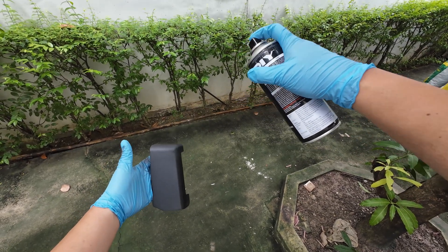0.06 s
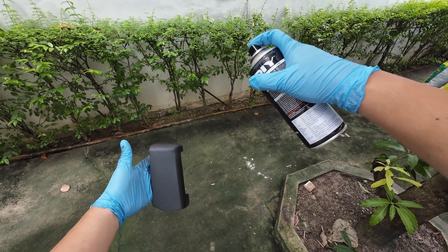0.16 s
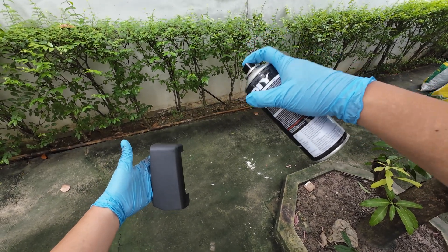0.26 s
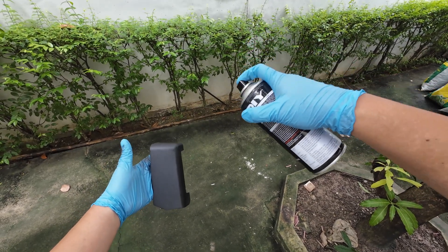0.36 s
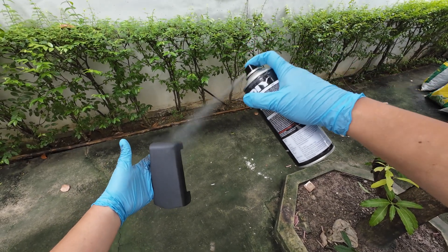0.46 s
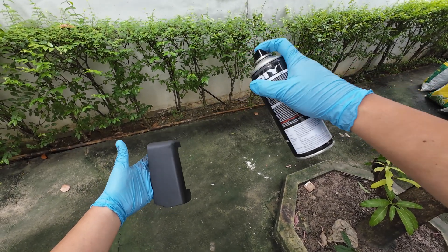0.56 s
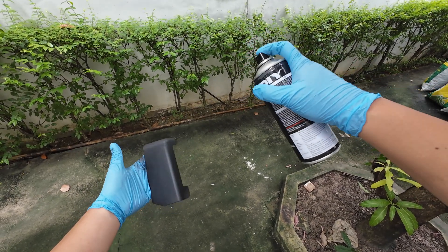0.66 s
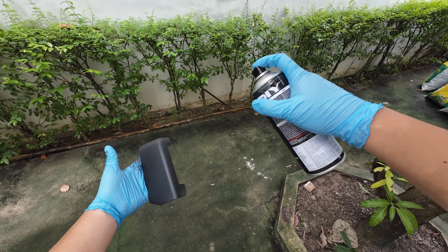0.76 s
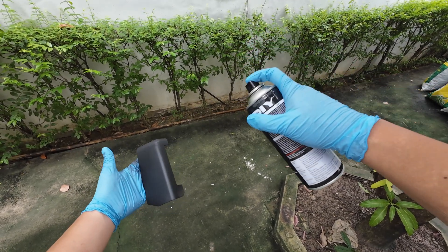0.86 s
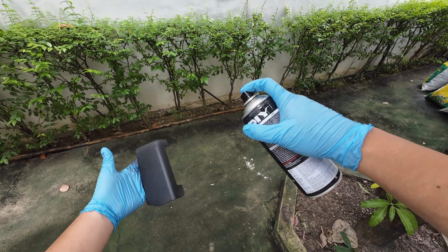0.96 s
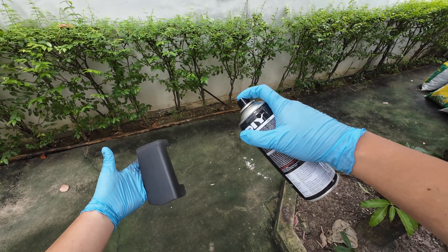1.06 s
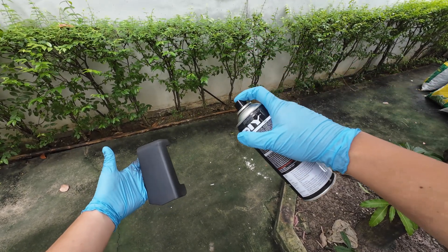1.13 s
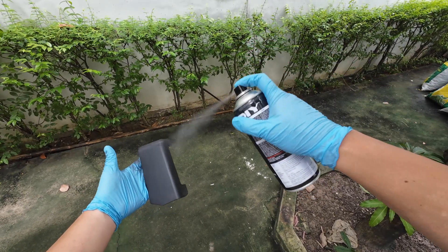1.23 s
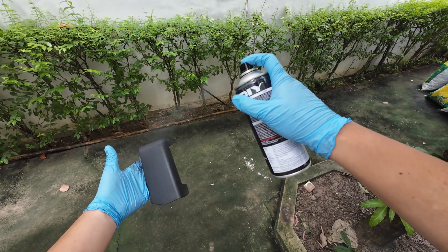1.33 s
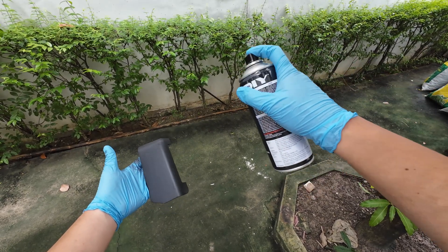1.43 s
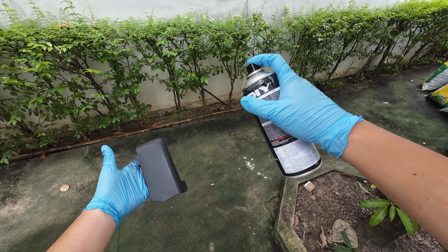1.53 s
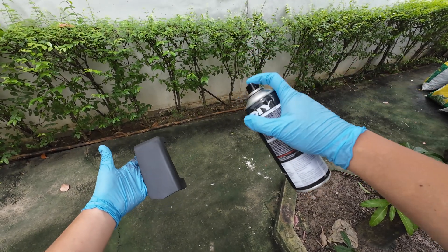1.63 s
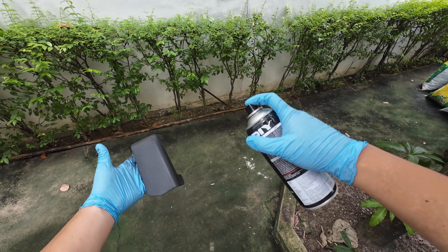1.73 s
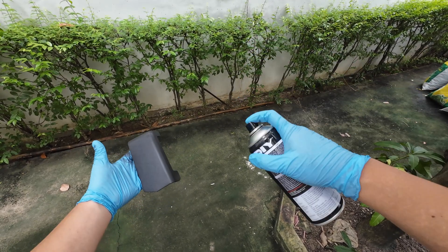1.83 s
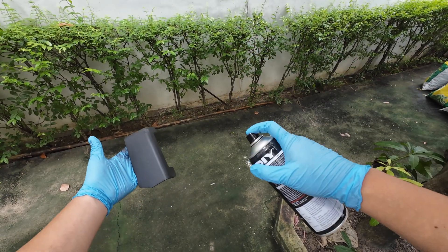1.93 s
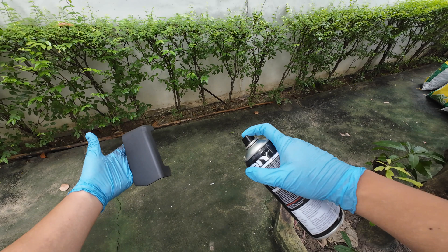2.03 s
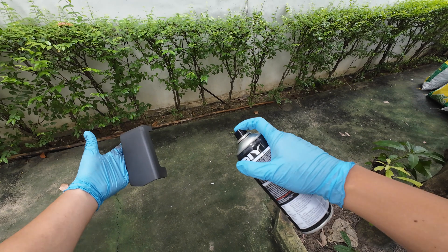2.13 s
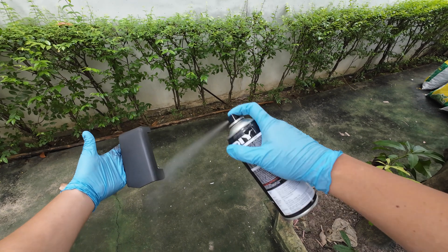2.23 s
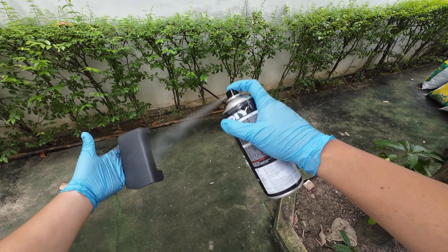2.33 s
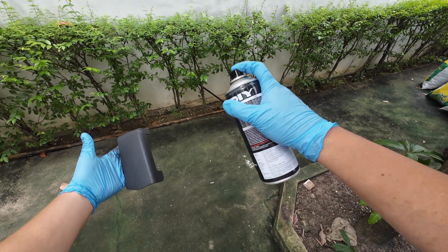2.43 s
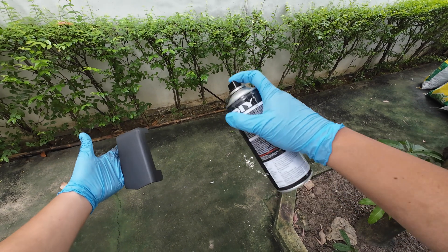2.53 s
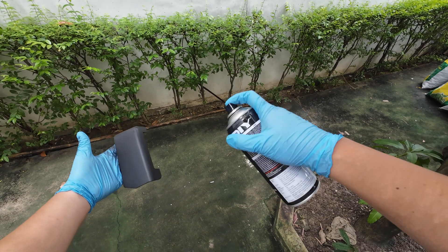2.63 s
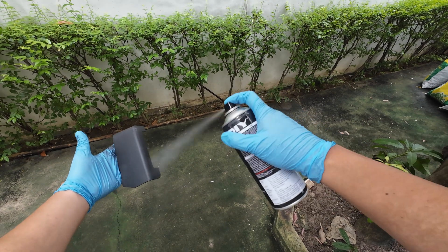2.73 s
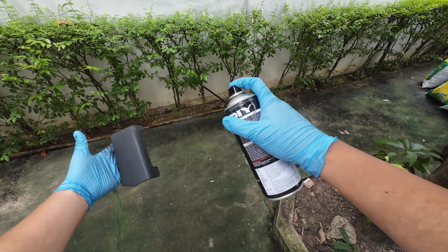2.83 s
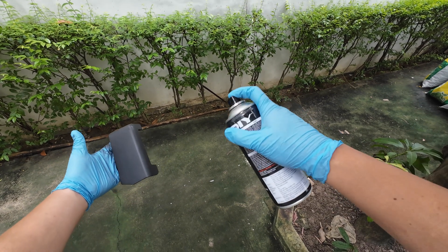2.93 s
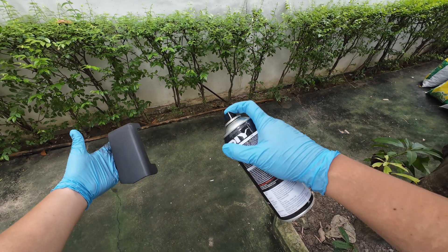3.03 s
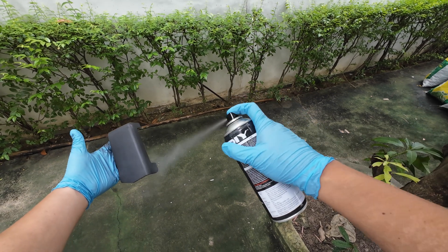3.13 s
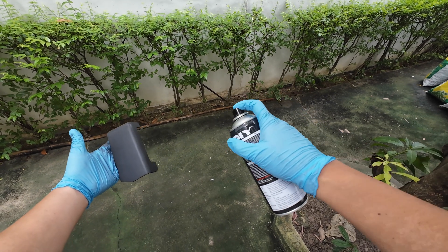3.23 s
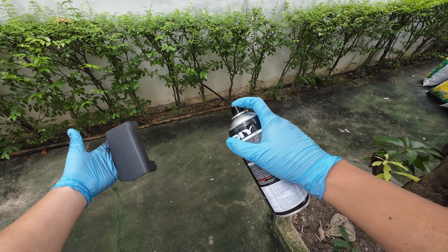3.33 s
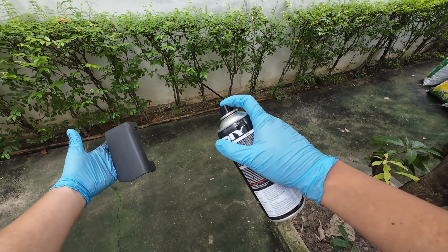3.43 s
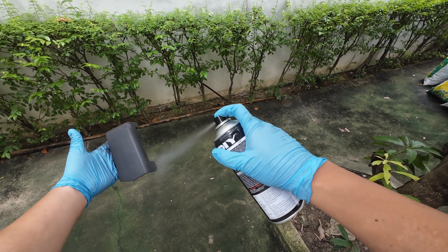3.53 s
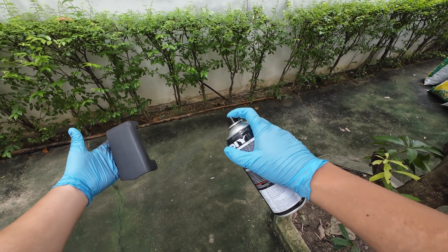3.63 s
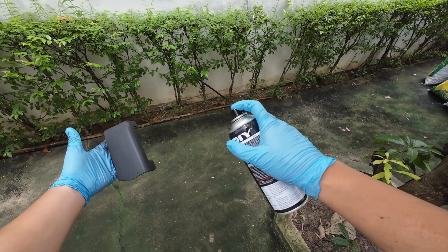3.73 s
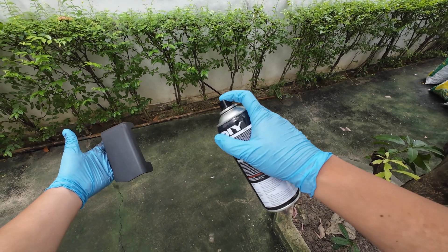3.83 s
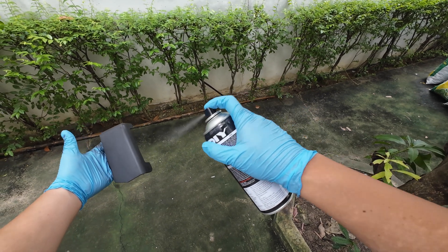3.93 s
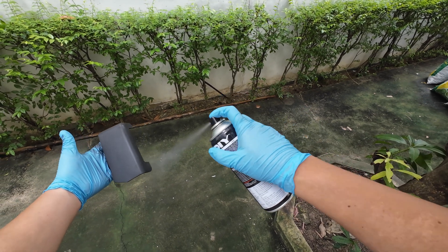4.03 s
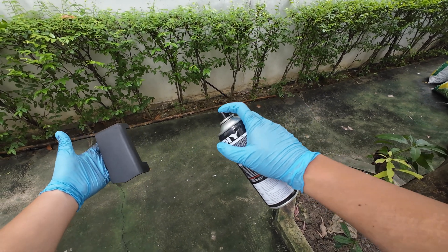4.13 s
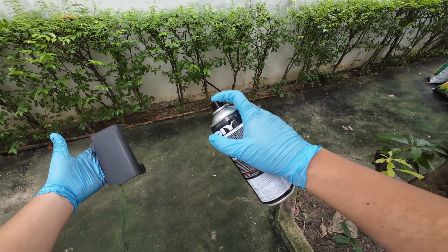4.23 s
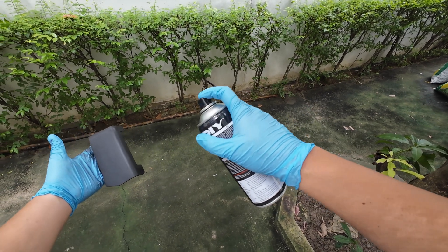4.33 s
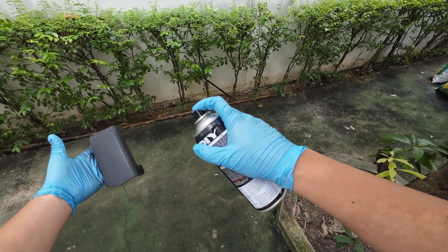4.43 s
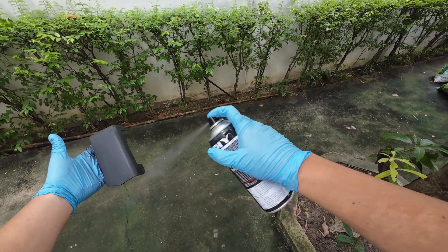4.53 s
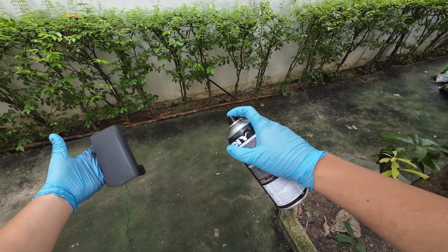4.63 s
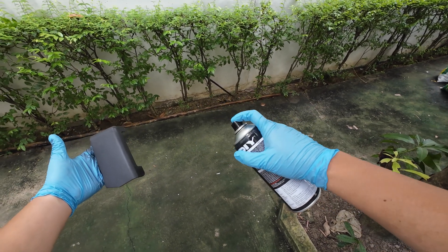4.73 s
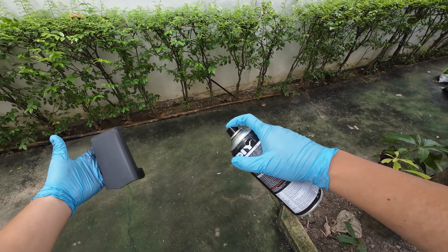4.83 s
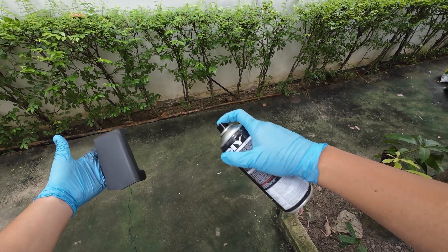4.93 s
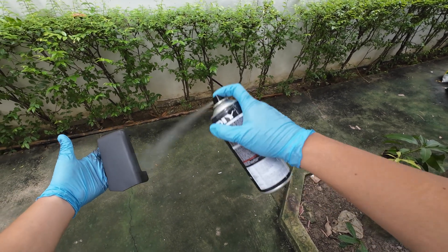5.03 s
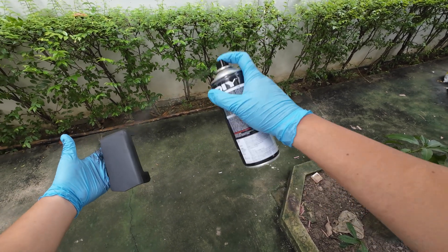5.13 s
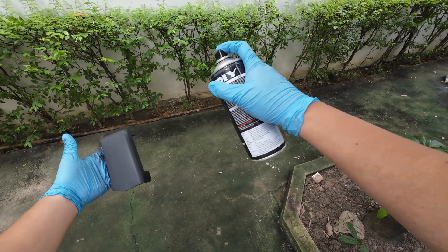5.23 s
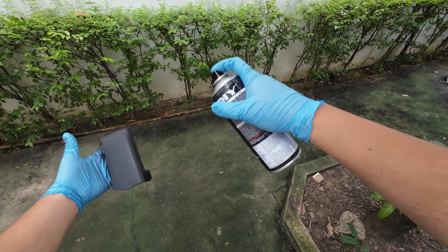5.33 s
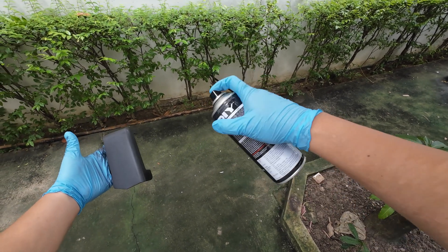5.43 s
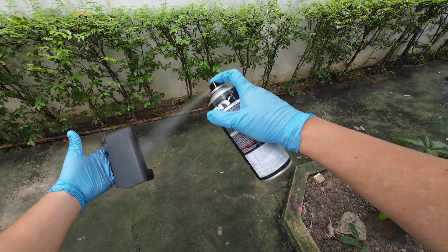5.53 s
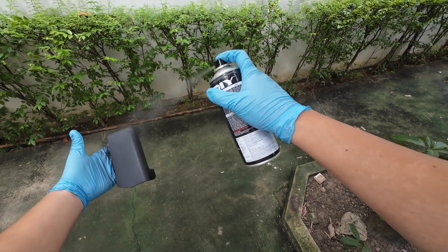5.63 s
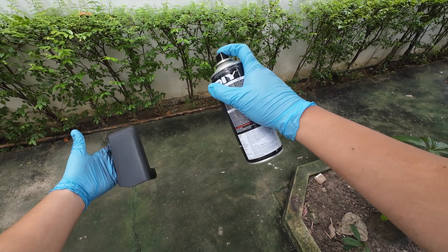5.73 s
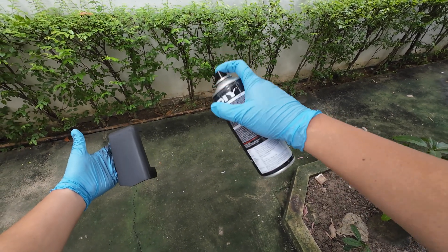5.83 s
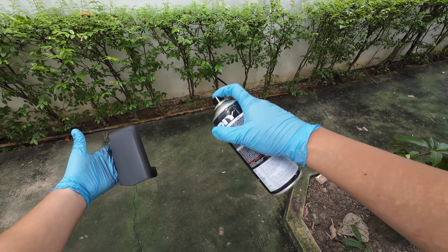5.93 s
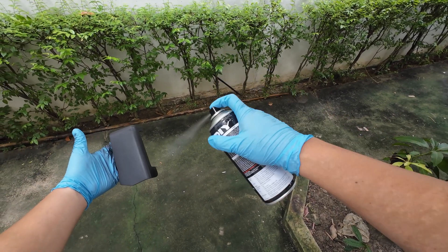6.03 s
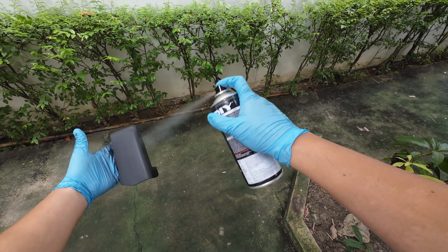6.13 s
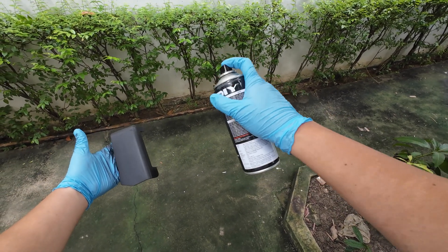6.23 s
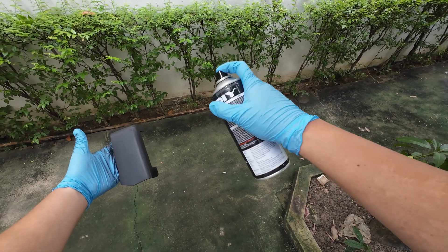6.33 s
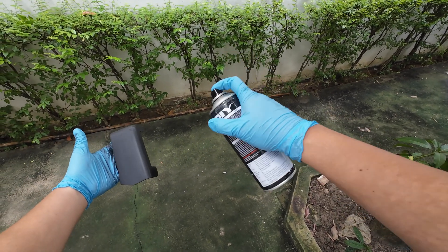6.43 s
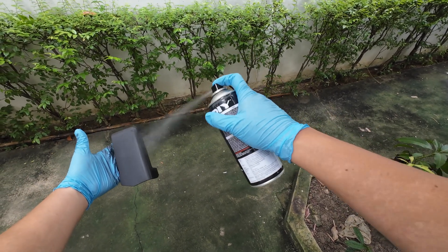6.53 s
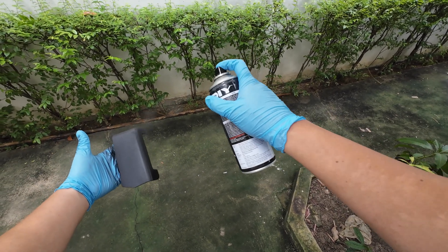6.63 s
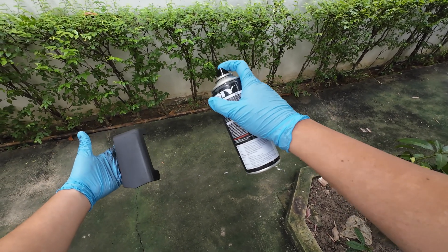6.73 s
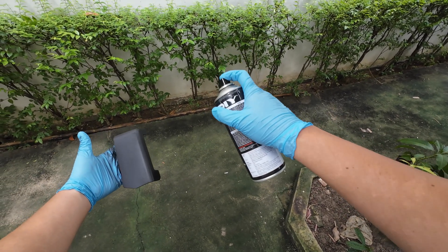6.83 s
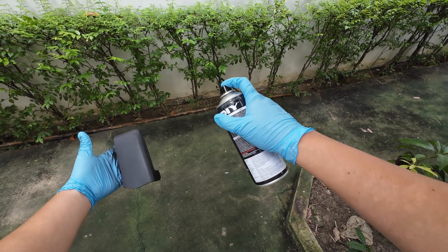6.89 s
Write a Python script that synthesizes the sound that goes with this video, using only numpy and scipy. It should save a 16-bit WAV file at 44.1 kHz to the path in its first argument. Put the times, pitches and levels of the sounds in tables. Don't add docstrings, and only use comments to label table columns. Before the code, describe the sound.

An aerosol paint can sprays thirteen short hissing bursts, about two a second, over a quiet garden bed of rumble and rustling leaves.

```python
import sys
import numpy as np
from scipy import signal
from scipy.fft import rfft, irfft, next_fast_len
from scipy.io import wavfile
from scipy.ndimage import uniform_filter1d, map_coordinates

SR = 44100
rng = np.random.default_rng(int(sys.argv[2]) if len(sys.argv) > 2 else 0)


def linear_from_db(decibels):
    return 10 ** (np.asarray(decibels, float) / 20)


def pcm_store(signal):
    levels = np.round(np.clip(np.atleast_2d(signal), -1, 1) * 32767)
    wavfile.write(sys.argv[1], SR, levels.astype(np.int16).T)


N = 306936

# pitch_hz, level_db (per Hz)
TOWN_COLOUR = [(12, -29), (20, -0.5), (42, 1), (70, -8), (103, -2.5), (173, -10.5), (230, -3.5), (262, -12),
               (298, -3.5), (329, -9.5), (493, -10.5), (529, -10.5), (620, -15.5), (810, -44.5),
               (1360, -120)]
TRAFFIC_COLOUR = [(340, -33), (580, -5), (729, -3.5), (920, -10), (1000, -12.5), (1400, -30.5),
                  (1820, -58.5), (3080, -120)]
LEAVES_COLOUR = [(650, -29.5), (1100, -6.5), (1440, -7), (2270, -7.5), (2560, -9.5), (2890, -7.5),
                 (4500, -17), (5850, -45.5), (9900, -120)]
RUSTLE_COLOUR = [(2350, -30), (4000, -4), (5310, -5), (7180, -13.5), (7820, -11), (11600, -14.5),
                 (13300, -14), (15600, -25)]
# time_s, level_db
TOWN_LEVEL = [(0, -49.5), (1.2, -49.5), (1.7, -50.5), (2.6, -49.7), (4.9, -51.3), (5.9, -51), (6.6, -49),
              (6.96, -49.5)]
# time_s, level_db
TRAFFIC_LEVEL = [(0, -61), (.55, -65), (1.1, -60), (1.65, -65.5), (2.15, -60.5), (3.4, -62.5), (3.75, -67),
                 (4.65, -61), (5.1, -62), (5.75, -68), (6.96, -65)]
# pitch_hz, width_hz, level_db
MACHINERY = [(97, 11, -64.5), (239, 8, -66.5), (305, 8, -68.5), (381.5, 6, -64.5), (521.5, 8, -68),
             (713.6, 8, -74)]
# time_s, strength_db
BREEZE_STRENGTH = [(0, -1), (1.55, -2), (1.85, 2), (2.1, -1.5), (2.65, 1.5), (3.05, 0), (3.45, 2),
                   (3.85, -1), (4.4, 1), (4.85, -1.5), (5.8, -1.5), (5.95, .5), (6.42, -.5), (6.96, 1.5)]
# loudest_s, level_db, pitch_hz, rise_db_per_s, fall_db_per_s
WHINE_PASSES = [
    (.28, -76, 2905, 35, 25),
    (2.05, -81, 2890, 30, 30),
    (2.54, -73, 2895, 120, 25),
    (6.85, -74, 2890, 120, 200),
    (6.87, -75, 2620, 200, 60),
]
# pitch_hz, likeness (-1 to 1)
FAR_LIKENESS = [(60, 0.4), (130, 0.9), (290, 0.98), (640, 0.95), (1410, 0.76), (3100, 0.3), (6820, -0.16),
                (15000, -0.16)]
# pitch_hz, left_minus_right_db
FAR_BALANCE = [(60, 1), (110, 0), (200, 2), (380, 0.5), (700, 0), (1290, 1.5), (2380, 1.5), (4400, 3.5),
               (8120, -2), (15000, -3)]
# start_s, end_s, pitch_hz, level_db
BIRD_CALLS = [
    (0.897, 0.996, 952, -67),
    (0.952, 1.133, 1173, -71),
    (1.4, 1.55, 1150, -70.5),
    (3.293, 3.5, 1117, -70),
    (3.76, 3.952, 920, -69),
    (4.288, 4.48, 1175, -65),
    (4.646, 4.85, 1130, -72),
    (3.402, 3.5, 4600, -78),
]
# pitch_hz, t60_s
ECHO_DECAY = [(300, 0.16), (3000, 0.33), (8000, 0.3), (14000, .3)]
# pitch_hz, level_db
ECHO_COLOUR = [(500, 0), (2000, 0), (2900, -4.5), (4200, 1.5), (9000, 0), (12800, -3), (15500, -0.5)]
# time_s, crack_peak_db, knock_relative_db
GLOVE_TICKS = [
    (0.9063, -66, -6),
    (2.6443, -52.5, -9),
    (2.674, -61.5, -5.5),
    (5.4075, -51, 11),
    (6.4664, -60, -2.5),
]
# pitch_hz, level_db (per Hz)
CRACK_COLOUR = [(800, -39), (2000, -12), (5000, -4), (10000, -8.5), (12800, 5), (14300, -8), (15500, -41.5)]
# seat_lifts_s, seat_shuts_s, paint_flow_db, gas_over_paint_db, gas_swell_while_held_db
PRESSES = [(-0.13, 0.032, -28.5, 5, 0), (0.4225, 0.571, -32.0, 6.0, 3.0), (1.217, 1.386, -31.0, 3.5, 4.0),
           (2.1865, 2.428, -31.5, 4.0, 4.5), (2.711, 2.875, -27.5, 2.0, 2.5),
           (3.092, 3.269, -31.0, 2.5, 1.5), (3.5285, 3.683, -31.0, 1.5, 1.0),
           (3.964, 4.13, -30.5, 2.0, 3.0), (4.4815, 4.614, -30.0, 3.0, -1.5),
           (4.988, 5.19, -30.0, 3.5, 1.0), (5.505, 5.714, -31.5, 4.5, -0.5),
           (6.051, 6.244, -31.0, 3.5, 1.0), (6.505, 6.688, -31.0, 4.0, -3.5)]
VALVE = [(lift, shut) for lift, shut, *_ in PRESSES]  # lift_s, shut_s
# push_slowness (ratio), lift_slowness (ratio), jet_on_part_db
FINGER = [(1, 1, 0), (.88, 1.13, 0), (1.03, .86, -3), (1.01, 1.01, -.5), (1.44, 1.22, -1.5), (.72, 1.05, 1),
          (.54, .85, 1.5), (.93, .93, 2), (1, .88, 1), (1.13, .96, -1), (1.25, 1.1, -1), (1.15, 1.03, 0),
          (.91, .96, -1)]
# bright_band_hz, top_edge_db, copy_delay_ms, ripple_db, one_crest_hz
AIM = [(13000, 0.5, 0.45, 2, 6000), (13010.0, -3.5, 0.46, 1.5, 7410.0), (11800.0, -1.0, 0.42, 2.5, 5020.0),
       (13140.0, -2.0, 0.84, 1.0, 5610.0), (13050.0, -0.5, 0.41, 2.0, 5700.0),
       (13180.0, -1.0, 0.43, 1.5, 6630.0), (13200.0, 2.0, 0.4, 2.0, 6660.0),
       (13120.0, 5.5, 0.38, 3.0, 6430.0), (13120.0, 3.5, 0.35, 3.5, 6730.0),
       (13080.0, -2.0, 0.73, 1.5, 6310.0), (13010.0, -3.0, 0.31, 2.0, 4900.0),
       (13200.0, -2.0, 0.2, 3.0, 7890.0), (13000.0, -3.0, 0.25, 2.0, 4900.0)]
# full_db, first_instant_below_full_db, build_s, finger_lifting_s, lift_loss_db
HISS_FLOW = (.4, -14.5, .021, .06, -13.8)
MIST_FLOW = (-4.9, -19.3, .015, .062, -15)
CORE_FLOW = (0, -39, .01, .054, -20.4)
WASH_FLOW = (-11.9, -37, .012, .049, -14)
# pitch_hz, level_db (per Hz)
HISS_COLOUR = [(4350, -45.5), (7400, -19.5), (8170, -10), (9610, -8), (10100, -8), (11200, -9), (12600, -1),
               (13000, -3.5), (13500, -4.5), (14100, -7), (15600, -18)]
MIST_COLOUR = [(2000, -30.5), (3400, -0.5), (4510, -3.5), (4980, -2.5), (5530, 0), (6350, 1), (7440, -5.5),
               (7900, -3), (10300, -30), (17400, -120)]
CORE_COLOUR = [(1060, -50.5), (1800, -22.5), (2230, -3.5), (2930, 1.5), (3070, 1.5), (3420, -14),
               (3800, -16.5), (4940, -40), (8360, -120)]
WASH_COLOUR = [(120, -31.5), (200, -1.5), (499, -3), (873, -9), (1210, -5), (1400, -6.5), (1820, -6.5),
               (2000, -9), (2600, -31.5), (4400, -120)]
# pitch_hz, likeness (0 to 1)
JET_LIKENESS = [(100, .93), (400, .99), (850, .93), (1200, 0.99), (4300, 0.99), (4800, .9), (6000, 1),
                (7600, 0.5), (8500, 0.5), (10500, .8), (12500, 1), (13800, .7), (14700, 0.3), (15500, .65)]
# pitch_hz, width_hz, level_db
SHADOWS = [(4800, 800, -2), (7600, 500, -2.5), (10850, 400, -2)]
# pitch_hz, width_hz, level_db
BODY = [(860, 130, -7), (1900, 150, -10), (9600, 400, -3), (11200, 400, -2), (13750, 300, -2)]
# pitch_hz, left_minus_right_db, left_lead_rad
PORTS = [(4400, 0, 0), (5000, 2, -.2), (6000, 1, -0.15), (6700, -3.5, -.6), (8000, 4, -0.51),
         (9000, -1, -.1), (10300, -2, -.4), (11300, 1, -.1), (12700, -2.5, 0), (13600, -0.5, -0.7),
         (14300, 6, 0), (15500, -1.5, .6)]


def unit(x):
    return x / np.sqrt(np.mean(x ** 2) + 1e-20)


def along(points, hz):
    f, v = np.transpose(points)
    return np.interp(np.log(hz + 1), np.log(f + 1), v)


def curve(points):
    s, v = np.transpose(points)
    return np.interp(np.arange(N) / SR, s, v)


def wobble(rate):
    knots = rng.standard_normal(int(N * rate / SR) + 4)
    return map_coordinates(knots, [np.arange(N) * rate / SR])


def whistle(pitch):
    return np.sin(2 * np.pi * np.cumsum(pitch) / SR)


def filtered(x, response):
    m = next_fast_len(N + 8192)
    return irfft(rfft(x, m) * response(np.fft.rfftfreq(m, 1 / SR)), m)[..., :N]


def panned(x, left_minus_right_db):
    return x * linear_from_db(np.outer([.5, -.5], left_minus_right_db))


def narrow(hz, width_hz):
    return unit(filtered(rng.standard_normal(N), lambda f: np.exp(-((f - hz) / width_hz) ** 2)))


def rush(colour, likeness, patchy_db, span=8, size=6, order=9):
    z = signal.stft(rng.standard_normal((2, N)), nperseg=2 ** order)[2]
    field = uniform_filter1d(rng.standard_normal(z.shape[1:]), size=size, axis=0)
    field = unit(uniform_filter1d(field, size=span, axis=1))
    pair = signal.istft(z * linear_from_db(patchy_db * field), nperseg=2 ** order)[1][:, :N]

    def response(hz):
        turn = np.arccos(np.clip(along(likeness, hz), -1, 1)) / 2
        return linear_from_db(along(colour, hz)) * [np.cos(turn), np.sin(turn)]

    mid, side = filtered(pair, response)
    return unit(np.array([mid + side, mid - side]))


def town():
    rumble = rush(TOWN_COLOUR, FAR_LIKENESS, patchy_db=2.7, span=3, size=1, order=12)
    return linear_from_db(curve(TOWN_LEVEL) + 0.52 * wobble(3.4)) * rumble


def traffic():
    tyres = rush(TRAFFIC_COLOUR, FAR_LIKENESS, patchy_db=6.0, span=3, size=1, order=12)
    return linear_from_db(curve(TRAFFIC_LEVEL) + .8 + .6 * wobble(4.6)) * tyres


def machinery():
    return sum(linear_from_db(db + 1.8 * wobble(1.5)) * narrow(hz, width) for hz, width, db in MACHINERY)


def leaves():
    breeze_db = curve(BREEZE_STRENGTH)
    soft = linear_from_db(-71.5 + .6 * breeze_db) * rush(LEAVES_COLOUR, FAR_LIKENESS, patchy_db=0.4)
    dry_rustle = linear_from_db(-76 + 1.6 * breeze_db) * rush(RUSTLE_COLOUR, FAR_LIKENESS, patchy_db=0.5)
    return linear_from_db(.7 * wobble(5.4)) * (soft + dry_rustle)


def whine():
    t, waver, flutter = np.arange(N) / SR, wobble(70), wobble(35)
    out = np.zeros(N)
    for nearest, db, hz, coming, going in WHINE_PASSES:
        distance_db = np.maximum(coming * (nearest - t), going * (t - nearest))
        out += linear_from_db(db - distance_db + 2.2 * flutter) * whistle(hz + 10 * waver)
    return out


def garden():
    bed = town() + traffic() + machinery() + leaves() + whine()
    return filtered(bed, lambda hz: linear_from_db(np.outer([.5, -.5], along(FAR_BALANCE, hz))))


def bird():
    out, t = np.zeros(N), np.arange(N) / SR
    waver, flutter = wobble(25), wobble(22)
    for start, end, hz, db in BIRD_CALLS:
        u = np.clip((t - start) / (end - start), 0, 1)
        pitch = hz * (1 - 0.027 * u + 0.0071 * waver)
        breath = np.sqrt(np.abs(np.sin(np.pi * u)))
        out += linear_from_db(db + 5 - 6.4 * u + 3.5 * flutter) * breath * whistle(pitch)
    return panned(out, [3.6])


def echo_tail():
    hz, t, z = signal.stft(rng.standard_normal((2, SR // 2)), SR, nperseg=256)
    z[1] *= np.clip(hz / 9000, .05, .9)[:, None]
    decay_db = along(ECHO_COLOUR, hz)[:, None] - 60 * t / along(ECHO_DECAY, hz)[:, None]
    mid, side = signal.istft(z * linear_from_db(decay_db), SR, nperseg=256)[1]
    return np.array([mid + side, mid - side]) / np.linalg.norm(mid)


def wall(x):
    earlier = linear_from_db(5.5) * np.tile(x[:, 1000:0:-1], 4)
    before = earlier.shape[1]
    late = np.pad(np.hstack([earlier, x]), ((0, 0), (500, 0)))
    cuts = [0] + [before + round(lift * SR) for lift, shut in VALVE[1:]] + [late.shape[1]]
    out = np.zeros((2, late.shape[1] + SR))
    for start, end in zip(cuts, cuts[1:]):
        answer = signal.fftconvolve(late[:, start:end], echo_tail(), axes=1)
        out[:, start:start + answer.shape[1]] += answer
    return out[:, before:][:, :N]


def ticks():
    cracks, knocks, t = np.zeros(N), np.zeros(N), np.arange(SR // 20) / SR
    for s, db, knock_db in GLOVE_TICKS:
        here = slice(round(s * SR), round(s * SR) + len(t))
        cracks[here] += linear_from_db(db - 60 * t / .012) * rng.standard_normal(len(t))
        knock = np.sin(2 * np.pi * 1950 * t) + 0.46 * np.sin(2 * np.pi * 2450 * t)
        knocks[here] += linear_from_db(db + knock_db - 9.5 - 60 * t / 0.05) * knock
    return knocks + filtered(cracks, lambda hz: linear_from_db(along(CRACK_COLOUR, hz)))


def valve():
    t, bleed_t60_s = np.arange(N) / SR, .045
    gate = sum((t >= lift) * linear_from_db(-60 * np.maximum(t - shut, 0) / bleed_t60_s) for lift, shut in VALVE)
    return np.abs(uniform_filter1d(gate, size=60))


def flow(rule, gas_share, part_share=0):
    full_db, first_db, build_s, lifting_s, loss_db = rule
    t = np.arange(N) / SR
    press = np.searchsorted([lift for lift, shut in VALVE], t, side="right") - 1
    lift, shut, paint_db, gas_db, swell_db, push, release, part_db = np.hstack([PRESSES, FINGER])[press].T
    fall_s = lifting_s * release
    held = np.clip((t - lift) / (shut - fall_s - lift), 0, 1)
    lifting = np.clip(1 + (t - shut) / fall_s, 0, 1)
    shape_db = first_db * np.exp(-(t - lift) / (build_s * push)) + loss_db * lifting
    gas_now_db = gas_db + swell_db * (held - .5)
    return paint_db + full_db + shape_db + gas_share * gas_now_db + part_share * part_db


def hiss(sputter):
    noise = rush(HISS_COLOUR, JET_LIKENESS, patchy_db=1.5, span=16, size=4)
    return linear_from_db(flow(HISS_FLOW, gas_share=1)) * unit(linear_from_db(.55 * sputter) * noise)


def mist(sputter):
    noise = rush(MIST_COLOUR, JET_LIKENESS, patchy_db=1.5, span=14, size=4)
    return linear_from_db(flow(MIST_FLOW, gas_share=.4)) * unit(linear_from_db(.55 * sputter) * noise)


def core(sputter):
    noise = rush(CORE_COLOUR, JET_LIKENESS, patchy_db=1.46, span=16, size=2)
    return linear_from_db(flow(CORE_FLOW, gas_share=0)) * unit(linear_from_db(.6 * sputter) * noise)


def wash(sputter):
    noise = rush(WASH_COLOUR, JET_LIKENESS, patchy_db=1.7, span=22, size=2)
    splash_db = flow(WASH_FLOW, gas_share=0, part_share=1) + 1.5 * wobble(30)
    return linear_from_db(splash_db) * unit(linear_from_db(0.76 * sputter) * noise)


def spray():
    sputter = 0.68 * wobble(63) + .9 * wobble(250) + 1.9 * wobble(900)
    treble = panned(hiss(sputter) + mist(sputter), -.7 + .6 * wobble(20))
    return valve() * (treble + core(sputter) + wash(sputter))


def aimed(jet):
    hz, t, z = signal.stft(jet, SR, nperseg=256)
    press = np.searchsorted([lift - .03 for lift, shut in VALVE[1:]], t)
    bright, top_db, delay_ms, ripple_db, crest = np.array(AIM)[press].T
    hz = hz[:, None]

    def bump(centre, width_hz):
        return np.exp(-(2 * (hz - centre) / width_hz) ** 2)

    gain_db = 3.2 * bump(bright, 900) + top_db * bump(14600, 2400)
    gain_db += sum(db * bump(centre, width) for centre, width, db in SHADOWS)
    comb = np.cos(2 * np.pi * (hz - crest) * delay_ms / 1000)
    gain_db += ripple_db * comb * bump(8000, 9000)
    return signal.istft(z * linear_from_db(gain_db), SR, nperseg=256)[1][:, :N]


def camera_body(hz):
    common_db = sum(db * np.exp(-(2 * (hz - centre) / width) ** 2) for centre, width, db in BODY)
    f, balance_db, lead = np.transpose(PORTS)
    half = np.array([[.5], [-.5]])
    return linear_from_db(common_db + half * np.interp(hz, f, balance_db)) * np.exp(1j * half * np.interp(hz, f, lead))


def scene():
    near = aimed(spray()) + ticks()
    return filtered(near + linear_from_db(-17) * wall(near), camera_body) + bird() + garden()


def top_cut(x):
    return signal.sosfilt(signal.butter(12, 15710, fs=SR, output="sos"), x)


def record(dry):
    return top_cut(dry)


dry = scene()
out = record(dry)
pcm_store(out)
```